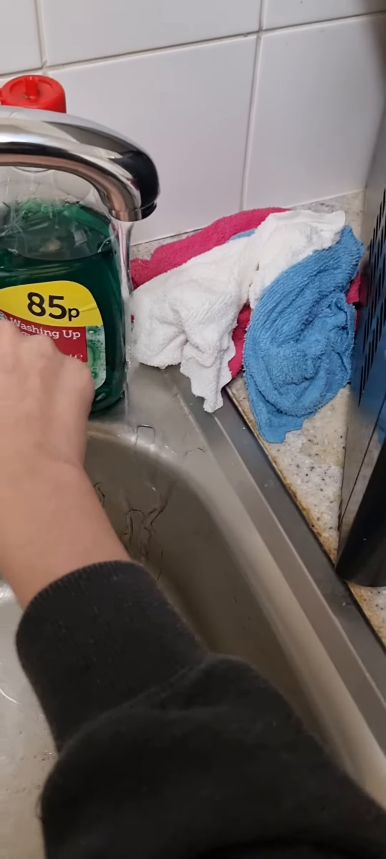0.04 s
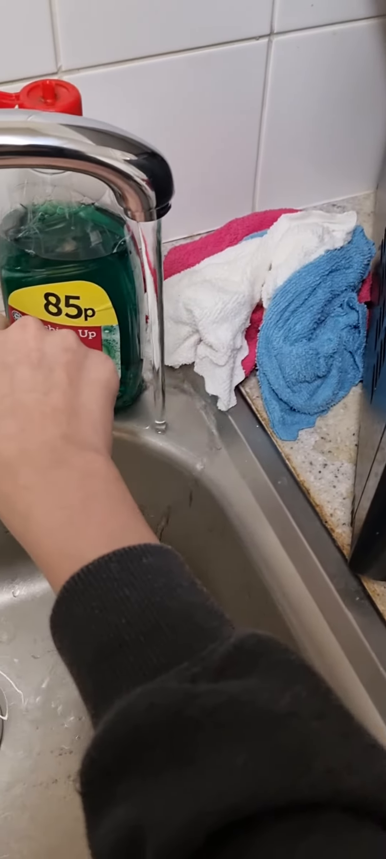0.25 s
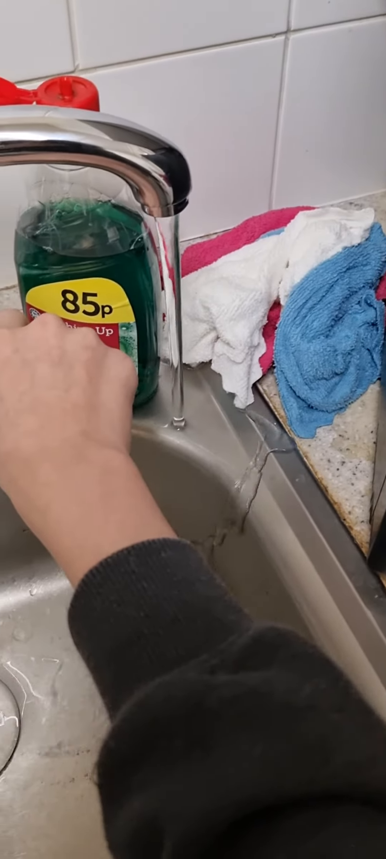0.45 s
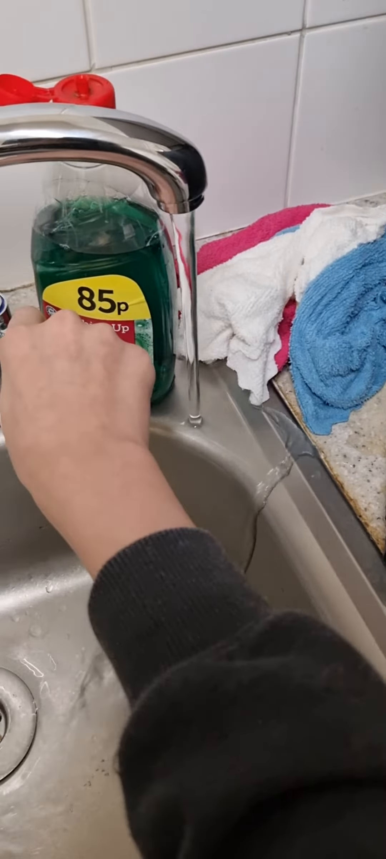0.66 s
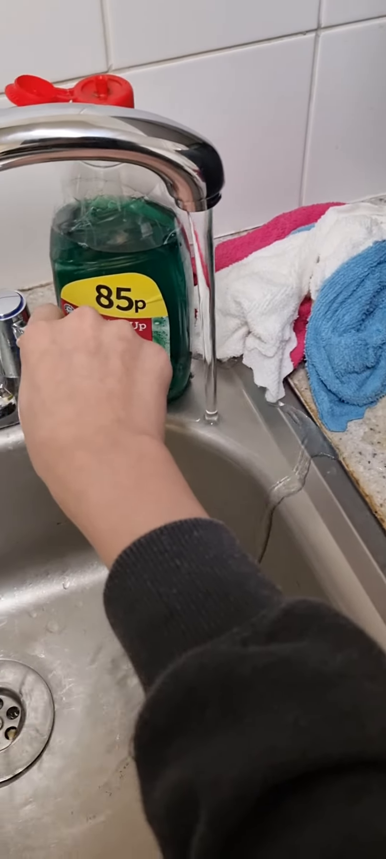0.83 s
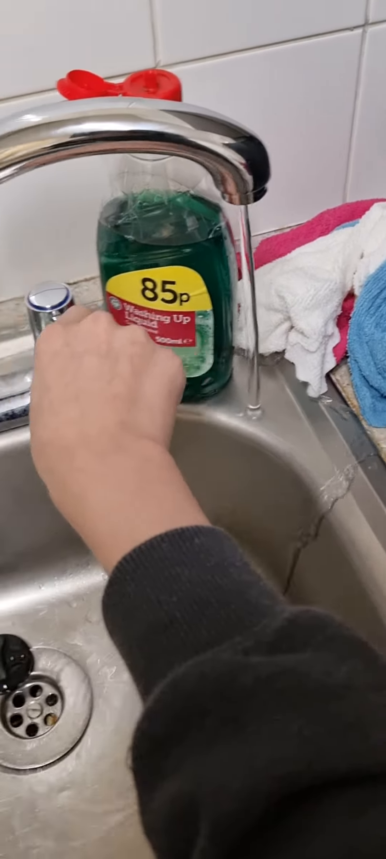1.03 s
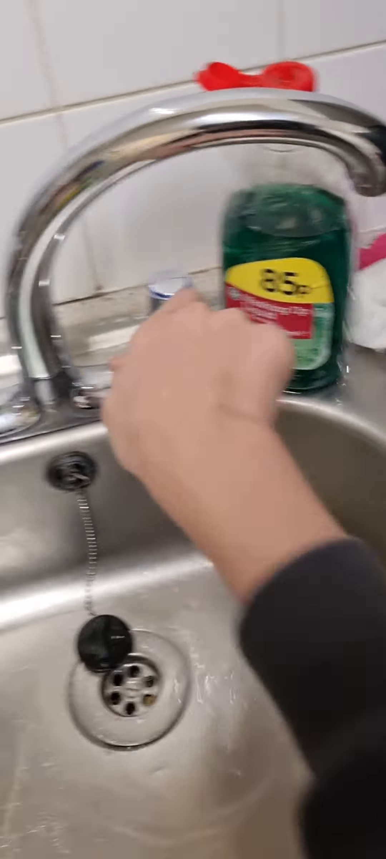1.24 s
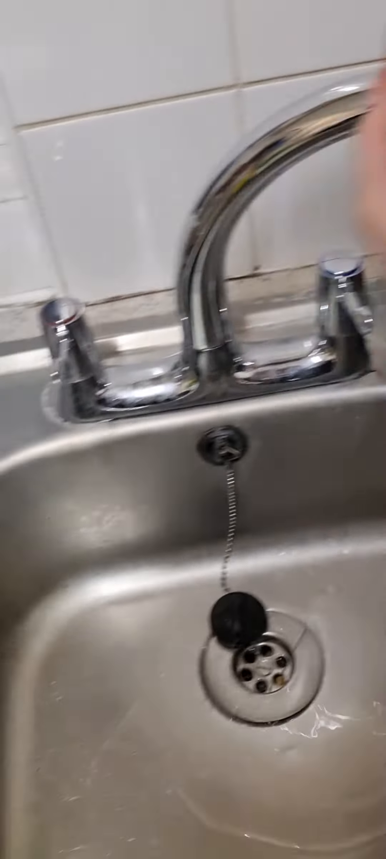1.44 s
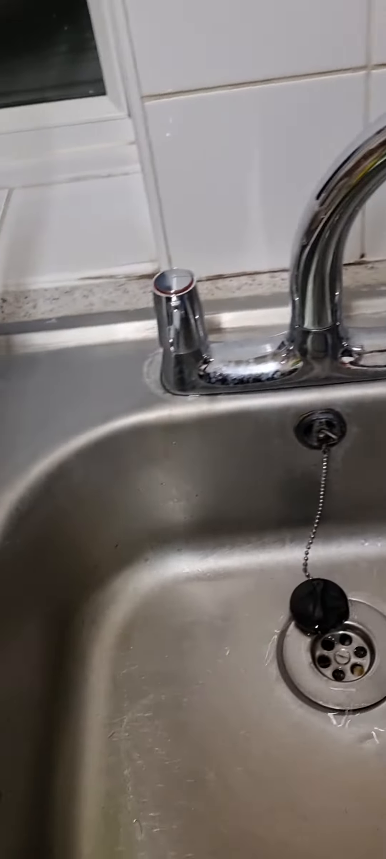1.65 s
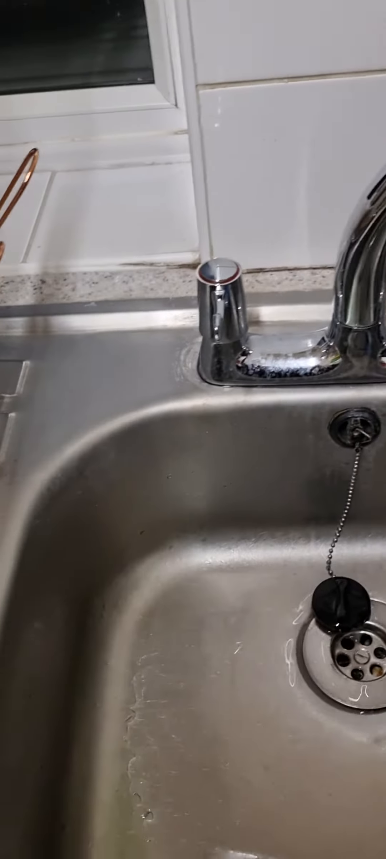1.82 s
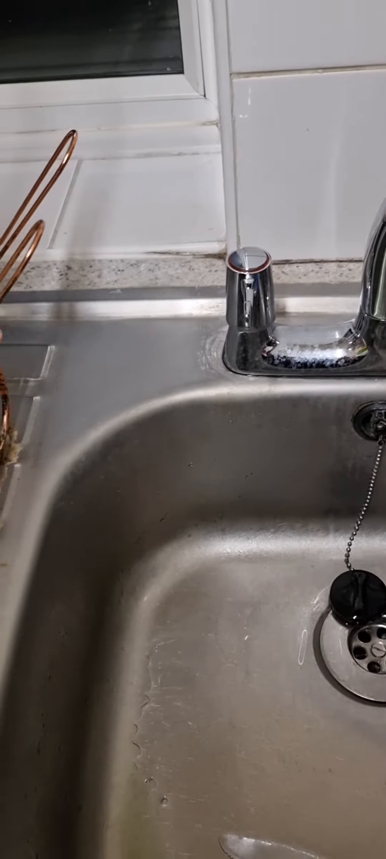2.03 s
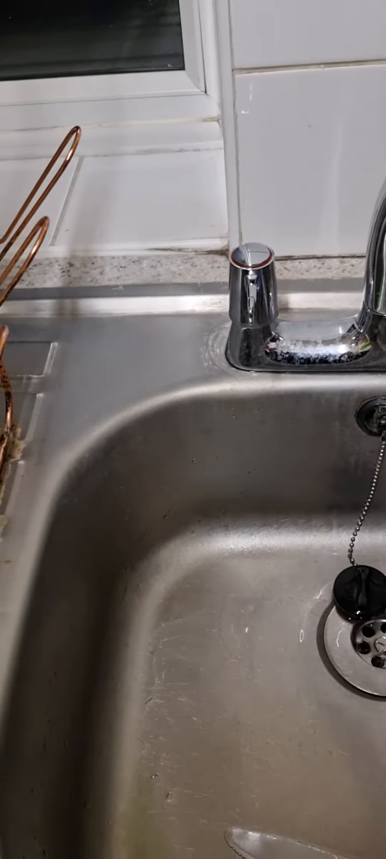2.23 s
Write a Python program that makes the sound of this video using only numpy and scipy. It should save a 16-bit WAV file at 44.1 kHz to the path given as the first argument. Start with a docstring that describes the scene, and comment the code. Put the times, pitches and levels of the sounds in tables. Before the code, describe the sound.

Close stereo pickup in a small kitchen: a tap stream hisses and drums on ringing steel, is shut off with pipe knocks and a metallic click, then drips, bubbling drain plops and a final soft thud.

```python
"""A kitchen tap runs into a steel sink: filtered drop impacts over noise boom, drum, splash and spray, ringing the steel.
The tap is shut with a shudder of decaying pipe modes, then a metal click of noise bursts.
The last water trickles as random drops and gulps in the drain as short falling tones with noise pops.
Something bumps the basin, sounding its modes. Two low hum tones, soft rumbles and room noise lie
underneath; noise tails give the knocks, ticks, gulps and bump a small tiled room."""
import sys
import numpy as np
from scipy import signal
from scipy.fft import rfft, irfft, next_fast_len
from scipy.io import wavfile
from scipy.ndimage import uniform_filter1d, map_coordinates

SR = 44100
rng = np.random.default_rng(int(sys.argv[2]) if len(sys.argv) > 2 else 0)


def waveform_to_disk(signal):
    """Save audio, clipped to [-1, 1], as 16-bit WAV at the path in sys.argv[1]."""
    frames = np.transpose(np.atleast_2d(signal))
    scaled = np.clip(frames, -1, 1) * 32767
    samples = np.round(scaled).astype(np.int16)
    wavfile.write(sys.argv[1], SR, samples)


N = 100503

# left-right likeness of falling water: freq_hz, correlation (-1 to 1)
WATER_ALIKE = [(100, 1), (250, 0.98), (600, 0.57), (1500, 0.06), (5000, 0.18), (15000, 0)]


def amp(db):
    """Decibels to amplitude gain."""
    return 10 ** (np.asarray(db) / 20)


def unit(x):
    """Scaled to rms 1."""
    return x / np.sqrt(np.mean(x ** 2) + 1e-20)


def along(points, hz):
    """(Hz, value) points interpolated on a log frequency axis."""
    f, v = np.transpose(points)
    return np.interp(np.log(hz + 1), np.log(f + 1), v)


def curves(rows):
    """One value per sample for each column after the time."""
    s, *cols = np.transpose(rows)
    return [np.interp(np.arange(N) / SR, s, c) for c in cols]


def wobble(knots_per_s):
    """A smooth random curve through normally distributed knots."""
    knots = rng.standard_normal(int(N * knots_per_s / SR) + 4)
    return map_coordinates(knots, [np.arange(N) * knots_per_s / SR])


def filtered(x, response):
    """x through a frequency response, by FFT with padding."""
    n = x.shape[-1]
    m = next_fast_len(n + 8192)
    return irfft(rfft(x, m) * response(np.fft.rfftfreq(m, 1 / SR)), m)[..., :n]


def panned(left_minus_right_db):
    """Left and right gains for a level difference."""
    return amp(np.array([[.5], [-.5]]) * left_minus_right_db)


def add(out, start_s, x):
    """Mix x into out from start_s."""
    part = out[:, round(start_s * SR):][:, :x.shape[-1]]
    part += x[..., :part.shape[-1]]


def noise_burst(t, response):
    """Stereo filtered noise at rms 1, as long as t."""
    return unit(filtered(rng.standard_normal((2, len(t))), response))


def stereo(pair, colour, alike):
    """Two unrelated signals made into a coloured, partly alike pair at rms 1."""
    def mid_side(hz):
        turn = np.arccos(np.clip(along(alike, hz), -1, 1)) / 2
        return amp(along(colour, hz)) * [np.cos(turn), np.sin(turn)]

    mid, side = filtered(pair, mid_side)
    return unit(np.array([mid + side, mid - side]))


def drop_sizes(drops_per_s, spread_db):
    """Drops at random instants; exponential dB spread makes a few much larger."""
    hit = rng.random((2, N)) < drops_per_s / SR
    return hit * amp(spread_db * np.minimum(rng.exponential(size=(2, N)), 4))


def patter(colour, wash_db, patchy_db):
    """Drop impacts over a noise wash, shifting in colour, echoing in the basin and ringing the steel."""
    # steel resonance centres: freq_hz
    steel_hz = [559, 2441, 3231, 3561, 4061, 4467, 10203, 11038, 12714, 14673, 15339]
    # steel resonances, in the same order: width_hz, peak_db re direct sound
    steel_modes = [(14.12, 6.5), (26, -3), (22.1, 5.5), (25, 0.5), (30.2, -1.5), (20, 6), (22, 0),
                   (26, 11.5), (90, -6.5), (32, 10), (70.6, 2)]
    # stereo balance: freq_hz, left_minus_right_db
    balance = [(110, -3), (200, -3), (380, -7), (700, -3.5), (1290, 0), (2380, -3), (4400, 0.4), (8120, 4),
               (15000, 1.5)]
    bowl_db, bowl_t60_s = -3, .12

    impacts = drop_sizes(drops_per_s=2700, spread_db=1.5) * np.sign(rng.standard_normal((2, N)))
    water = unit(impacts) + amp(wash_db) * rng.standard_normal((2, N))

    # smooth random gains over frequency and time
    z = signal.stft(water, nperseg=512)[2]
    field = uniform_filter1d(rng.standard_normal(z.shape[1:]), size=7, axis=0)
    field = uniform_filter1d(field, size=10, axis=1)
    water = signal.istft(z * amp(patchy_db * unit(field)), nperseg=512)[1][:, :N]
    pair = stereo(water, colour, WATER_ALIKE)

    t = np.arange(SR // 8) / SR
    echoes = rng.standard_normal((2, len(t))) * amp(-60 * t / bowl_t60_s)
    echoes = filtered(echoes / np.linalg.norm(echoes[0]), lambda f: f / np.hypot(f, 600))
    pair = pair + amp(bowl_db) * signal.fftconvolve(pair, echoes, axes=1)[:, :N]

    def steel(f):
        gain = 1
        for centre, (width, db) in zip(steel_hz, steel_modes):
            gain = gain + amp(db) * 1j * f * width / (centre * centre - f * f + 1j * f * width)
        return gain

    return unit(filtered(pair, lambda f: steel(f) * panned(along(balance, f))))


def jet(fade_db_per_s=120, flutter_db=0.8):
    """The stream booms, drums, splashes and sprays; each layer fades steadily after its last level."""
    # jet on the basin floor, before trims: time_s, boom_db, drum_db
    drumming = [(0.0, -61.5, -72.5), (0.104, -48.5, -60.5), (0.178, -52, -49.5), (0.544, -60, -52.5),
                (0.636, -57, -48.5), (0.692, -59, -53.5), (0.756, -53, -52), (0.83, -61, -53.5),
                (0.914, -58, -50), (0.934, -45, -47), (1.004, -58.5, -58), (1.04, -51.5, -59)]
    # splashing water, before trim: time_s, level_db
    splash_level = [(0, -60.5), (.06, -57), (.12, -44.5), (.19, -38), (.3, -40.5), (.41, -39), (.5, -38.5),
                    (.58, -38.5), (.7, -39), (.83, -38), (.94, -36), (.975, -39), (1.035, -53),
                    (1.13, -67.5)]
    # fine spray, before trim: time_s, level_db
    spray_level = [(0, -50), (.06, -45), (.15, -40.5), (.31, -41.5), (.34, -33.5), (.365, -33.5),
                   (.39, -41), (.44, -39), (.51, -34), (.58, -36.5), (.7, -38), (.84, -36.5), (.95, -42),
                   (.99, -45), (1.04, -60.5), (1.13, -90)]
    # low boom spectrum: freq_hz, level_db (per Hz)
    boom_colour = [(60, -41), (110, -1), (160, -2), (200, 6), (250, -9.5), (310, -9.5), (380, -23),
                   (600, -31.5)]
    # drumming spectrum: freq_hz, level_db (per Hz)
    drum_colour = [(200, -31), (330, -11), (420, -8), (550, -6), (660, -13), (850, -2.5), (1050, -10),
                   (1300, -8.5), (2200, -45.5), (4000, -53)]
    # splash spectrum: freq_hz, level_db
    splash_colour = [(900, -58.5), (1500, -6), (2000, -2.5), (2550, 4.5), (2950, -1), (3300, 2), (4100, 5),
                     (4700, 0), (5700, -1), (7500, -6.5), (10000, -10.5), (15000, -37)]
    # spray spectrum: freq_hz, level_db
    spray_colour = [(2500, -51), (5000, -2.5), (6600, -1.5), (7900, -8), (9500, -1), (10500, -4.5),
                    (11600, 0.5), (12600, 0.5), (13300, 0), (14200, -3.5), (15000, 1), (16000, -7.5)]
    boom_trim_db, drum_trim_db, splash_trim_db, spray_trim_db = 1.5, 1.5, 2.5, 2.5
    t = np.arange(N) / SR

    def level(rows):
        return curves(rows) - fade_db_per_s * np.maximum(t - rows[-1][0], 0)

    boom_db, drum_db = level(drumming)
    drum_db = drum_db + 1.1 * wobble(48.86)
    boom = amp(boom_db + boom_trim_db) * patter(boom_colour, wash_db=1.5, patchy_db=-0.5)
    drum = amp(drum_db + drum_trim_db) * patter(drum_colour, wash_db=0, patchy_db=1.0)
    splash = amp(level(splash_level) + splash_trim_db) * patter(splash_colour, wash_db=-0.5, patchy_db=1.0)
    spray = amp(level(spray_level) + spray_trim_db) * patter(spray_colour, wash_db=3, patchy_db=1.5)
    return (boom + drum + splash + spray) * amp(flutter_db * wobble(100))


def struck(blows, modes, attack_s, scuff_db, scuff_t60_s, spread_rad, pan_db):
    """Blows ring decaying modes, each with a dull noise scuff; higher modes differ more in phase left to right."""
    out, t = np.zeros((2, N)), np.arange(SR // 2) / SR
    top_hz, tilt_hz = modes[-1][0], modes[1][0]
    for start_s, level_db, bright_db_per_oct in blows:
        ring = 0
        for hz, mode_db, t60_s in modes:
            phase = spread_rad * hz / top_hz * rng.standard_normal((2, 1)) + rng.uniform(0, 2 * np.pi)
            tilt_db = bright_db_per_oct * np.log2(hz / tilt_hz)
            envelope = amp(mode_db + tilt_db - 60 * t / t60_s)
            ring = ring + envelope * np.sin(2 * np.pi * hz * t + phase)
        scuff = noise_burst(t, lambda f: 1 / (1 + (f / 1100) ** 3))
        blow = ring + amp(scuff_db - 60 * t / scuff_t60_s) * scuff
        add(out, start_s, amp(level_db) * blow * (1 - np.exp(-t / attack_s)))
    return out * panned(pan_db)


def shudder():
    """The closing valve knocks the tap and its pipe into ringing."""
    # knocks, before mode levels: start_s, level_db, brightness_db_per_octave
    knocks = [(1.0575, -40.5, 1.5), (1.0605, -35, -3.5), (1.066, -43.5, 5), (1.077, -39.5, 1.5),
              (1.086, -39, -14.5), (1.103, -39.5, -1), (1.124, -41, -2.5), (1.165, -42.5, -1),
              (1.22, -40, -9.5)]
    # tap and pipe modes, before brightness: freq_hz, level_db, t60_s
    pipe = [(105.7, -9, 0.11), (184, -4.5, 0.05), (253, -5.5, 0.077), (301, -6, 0.059), (478, -10.5, 0.079),
            (647, -14, 0.069), (773, -8.5, 0.031), (906, -3.5, 0.022), (995, -7, 0.057), (1220, -21, .04)]
    return struck(knocks, pipe, attack_s=0.00033, scuff_db=-6.5, scuff_t60_s=0.05,
                  spread_rad=.7, pan_db=-3.5)


def ticks():
    """Tap metal and drops on steel: a bright noise crack with a thin, narrow-band ring."""
    # sharp ticks, before trim: start_s, level_db, pan_db (left minus right), ring_db (over crack)
    tick_events = [(1.163, -26, 0.5, -19), (1.5247, -46, -2, -33), (1.527, -53, -1, -33),
                   (1.626, -56, -2, -30), (1.641, -60, -0.5, -35), (1.9255, -55, 0, -37),
                   (1.937, -66, -3, -35), (2.1165, -58, -3.5, -35), (2.164, -43, -2, -42),
                   (2.2395, -51.5, -2, -39)]
    # crack spectrum: freq_hz, level_db
    crack_colour = [(500, -23.5), (1500, -6.5), (3500, -12.5), (4600, -5), (6000, -4), (7800, 4),
                    (9500, -0.5), (13000, -7), (16000, -4.5)]
    trim_db, crack_t60_s = -4.5, .024
    ring_hz, ring_width_hz, ring_t60_s = 7900, 450, .22
    out, t = np.zeros((2, N)), np.arange(SR // 3) / SR
    for start_s, level_db, pan_db, ring_db in tick_events:
        crack = noise_burst(t, lambda f: amp(along(crack_colour, f)))
        ring = noise_burst(t, lambda f: 1 / (1 + ((f - ring_hz) / ring_width_hz) ** 2))
        tick = crack * amp(-60 * t / crack_t60_s) + ring * amp(ring_db - 60 * t / ring_t60_s)
        add(out, start_s, amp(level_db + trim_db) * panned(pan_db) * tick)
    return out


def gulps():
    """Each bubble pops and sounds a short tone that drops onto its pitch as the air pocket opens."""
    # drain bubbles, before trim: start_s, level_db, settled_pitch_hz, t60_s,
    # pan_db (left minus right), pop_db (over tone)
    bubbles = [(1.465, -44.5, 1747, 0.066, -4, -12.5), (1.5575, -40, 1840, 0.056, -2.5, 0),
               (1.6008, -39.5, 2320, 0.013, 0, -1.5), (1.640, -40, 1647, 0.058, 0, -2),
               (1.7221, -53, 1780, 0.06, -4, -9), (1.748, -43, 1630, 0.044, 1.5, -6),
               (1.7616, -41, 1606, 0.055, 1, -11), (1.7997, -51, 1530, 0.032, -3, -2),
               (1.903, -53, 1880, 0.015, -3, -7), (1.9255, -50, 1940, 0.019, -3, -10),
               (1.937, -48.5, 1530, 0.047, 5.5, -1)]
    # pop spectrum: freq_hz, level_db
    pop_colour = [(900, -54.5), (1500, -2.5), (1950, 0), (2400, -8), (2900, 0.5), (3150, -27),
                  (3400, -15.5), (6000, -25), (16000, -50)]
    trim_db, pop_t60_s, attack_s = -2, .014, .0005
    bend, bend_s = .33, .0017  # starting excess as a fraction of pitch, and its time constant
    out, t = np.zeros((2, N)), np.arange(SR // 6) / SR
    for start_s, level_db, hz, t60_s, pan_db, pop_db in bubbles:
        phase = 2 * np.pi * np.cumsum(hz * (1 + bend * np.exp(-t / bend_s))) / SR
        tone = amp(-60 * t / t60_s) * np.sin(phase)
        pop = amp(pop_db - 60 * t / pop_t60_s) * noise_burst(t, lambda f: amp(along(pop_colour, f)))
        attack = 1 - np.exp(-t / attack_s)
        add(out, start_s, panned(pan_db) * amp(level_db + trim_db) * attack * (tone + pop))
    return out


def squirts():
    """Air squirts breathily through the drain: short bursts of narrow-band noise."""
    # squirts: start_s, level_db, pitch_hz
    squirt_events = [(1.623, -53, 4480), (1.7182, -58.5, 3880), (1.795, -62, 4090), (2.14, -44, 2850)]
    width_hz, t60_s, attack_s = 210, .035, .002
    out, t = np.zeros((2, N)), np.arange(SR // 6) / SR
    for start_s, level_db, hz in squirt_events:
        air = noise_burst(t, lambda f: 1 / (1 + ((f - hz) / width_hz) ** 4))
        add(out, start_s, amp(level_db - 60 * t / t60_s) * (1 - np.exp(-t / attack_s)) * air)
    return out


def trickle():
    """Tiny random drops coloured by the hollow of the drain."""
    # last water running down: time_s, level_db
    trickle_level = [(1.4, -77.5), (1.6, -74), (1.76, -62.5), (1.85, -68), (1.94, -61.5), (2.08, -75.5),
                     (2.17, -56), (2.27, -60)]
    # drain spectrum: freq_hz, level_db (per Hz)
    trickle_colour = [(250, -9), (420, 8), (650, -11), (850, -5), (1250, -10), (1640, 7.5), (1950, -2),
                      (2400, -16.5), (2850, 2.5), (3300, -20), (4300, -16), (6500, -25.5), (9500, -27.5),
                      (16000, -28.5)]
    drops = drop_sizes(drops_per_s=3000, spread_db=2.5) * rng.standard_normal((2, N))
    return amp(curves(trickle_level)[0]) * stereo(drops, trickle_colour, WATER_ALIKE)


def bump():
    """Something bumps the basin and rings its low modes."""
    # bumps, before mode levels: start_s, level_db, brightness_db_per_octave
    bumps = [(2.163, -58.5, 15), (2.184, -31.5, 2.5), (2.209, -38.5, 0)]
    # basin modes, before brightness: freq_hz, level_db, t60_s
    basin = [(199.5, 1, 0.1), (224, -8.5, 0.11), (329.4, -9.5, 0.26), (384, -6, 0.061), (453, -9, 0.084),
             (542, -19, 0.13), (671, -21, 0.28), (940, -18, 0.048), (1136, -30, 0.031)]
    return struck(bumps, basin, attack_s=0.001, scuff_db=-11.5, scuff_t60_s=0.045,
                  spread_rad=0.81, pan_db=-2.5)


def kitchen(x, walls_db, room_db, walls_t60_s=0.087, gap_s=.004):
    """Adds dense quick reflections from basin and tiles, and the room's tail, both as decaying noise."""
    # tail decay: freq_hz, t60_s
    room_t60 = [(150, 0.48), (1000, 0.46), (4000, 0.38), (14000, 0.21)]
    hz, t, z = signal.stft(rng.standard_normal((2, SR // 2)), SR, nperseg=256)
    decay = amp(-60 * t / along(room_t60, hz)[:, None])
    tail = signal.istft(z * decay, SR, nperseg=256)[1]
    t = np.arange(tail.shape[1]) / SR
    walls = rng.standard_normal(tail.shape) * amp(-60 * t / walls_t60_s)
    answer = amp(room_db) * tail / np.linalg.norm(tail[0])
    answer = answer + amp(walls_db) * walls / np.linalg.norm(walls[0])
    # delay by gap_s and thin the bass
    answer = filtered(answer, lambda f: np.exp(-2j * np.pi * f * gap_s) * f / np.hypot(f, 350))
    return x + signal.fftconvolve(x, answer, axes=1)[:, :N]


def background():
    """Room noise, hum tones unsteady in level and phase, and low noise swelling into soft rumbles."""
    # hum tones, before sway: freq_hz, level_db (rms)
    hum_tones = [(61.5, -57), (101, -64)]
    # soft rumbles: centre_s, length_s (Gaussian, centre to 1/e), level_db
    rumbles = [(1.215, 0.11, -57), (1.723, 0.064, -54), (1.892, 0.11, -61.5)]
    # rumble spectrum: freq_hz, level_db (per Hz)
    rumble_colour = [(40, -35), (100, 3.5), (190, -3.5), (300, -14), (800, -16.5), (1800, -20.5),
                     (5000, -47.5)]
    # room noise spectrum: freq_hz, level_db (per Hz)
    floor_colour = [(15, -45), (28, -25), (40, 3.5), (62, -4), (78, -9.5), (130, -7.5), (200, -13),
                    (260, -19.5), (734, -25), (1300, -29), (1800, -37), (2800, -36.5), (3600, -42),
                    (8000, -49.5), (12900, -47.5), (16000, -55)]
    # left-right likeness: freq_hz, correlation (-1 to 1)
    floor_alike = [(60, 0.97), (200, .9), (600, 0.48), (2000, 0.067), (10000, .1)]
    floor_db = -59
    sway_db, sway_rad, sway_per_s = 1.2, .25, 6
    t = np.arange(N) / SR
    hum = 0
    for hz, level_db in hum_tones:
        level = amp(level_db + sway_db * wobble(sway_per_s)) * np.sqrt(2)
        hum = hum + level * np.sin(2 * np.pi * hz * t + sway_rad * wobble(sway_per_s))
    swell = sum(amp(db) * np.exp(-((t - s) / length_s) ** 2) for s, length_s, db in rumbles)
    rumble = swell * stereo(rng.standard_normal((2, N)), rumble_colour, floor_alike)
    room_noise = amp(floor_db) * stereo(rng.standard_normal((2, N)), floor_colour, floor_alike)
    return hum + rumble + room_noise


def scene():
    """Running water, the closing tap, the drain and the bump, over the background."""
    hits = kitchen(shudder() + bump(), walls_db=-7, room_db=-7.5)
    hits = hits + kitchen(ticks(), walls_db=-7, room_db=-6)
    drain = kitchen(gulps() + squirts(), walls_db=-3.5, room_db=-7.5)
    return jet() + hits + drain + trickle() + background()


def record(dry):
    """A very steep low-pass, 3 dB down at the band limit."""
    top_hz = 15830
    return filtered(dry, lambda hz: 1 / np.sqrt(1 + (hz / top_hz) ** 400))


dry = scene()
out = record(dry)
waveform_to_disk(out)
```